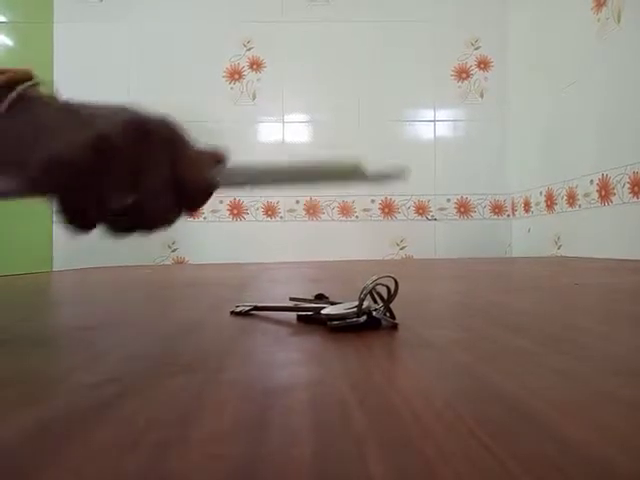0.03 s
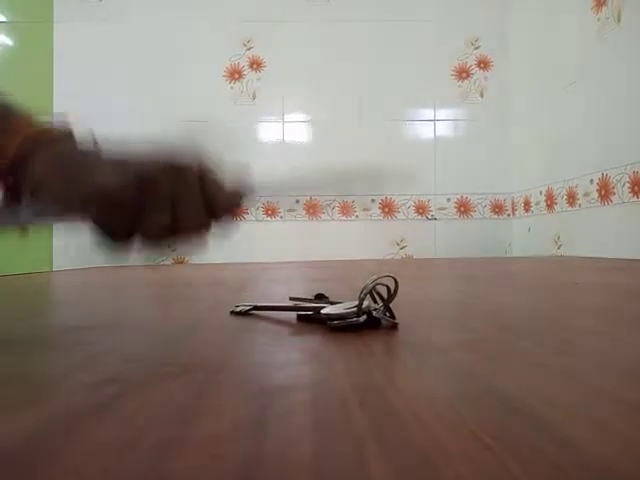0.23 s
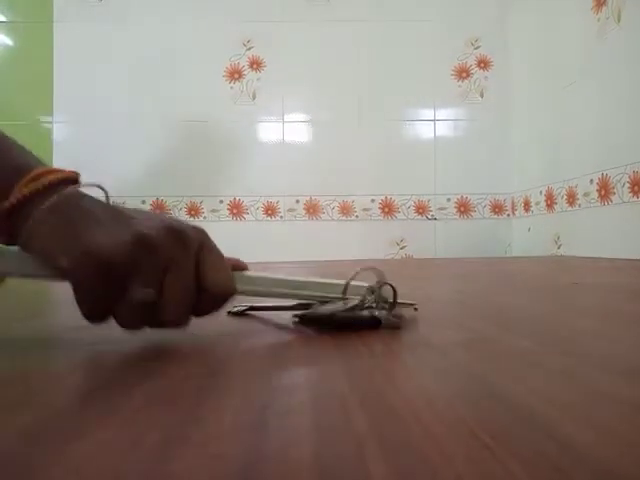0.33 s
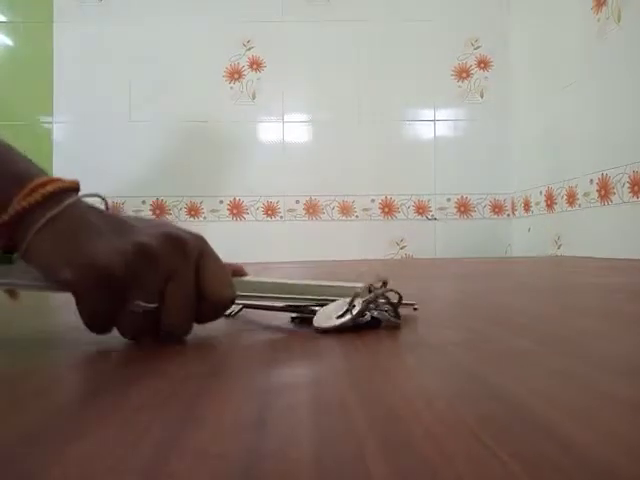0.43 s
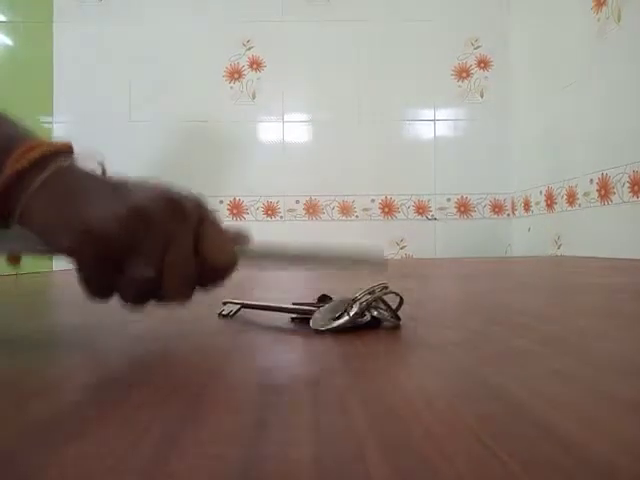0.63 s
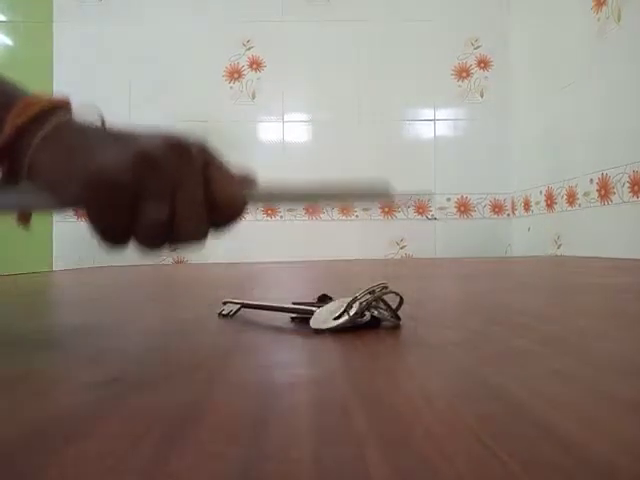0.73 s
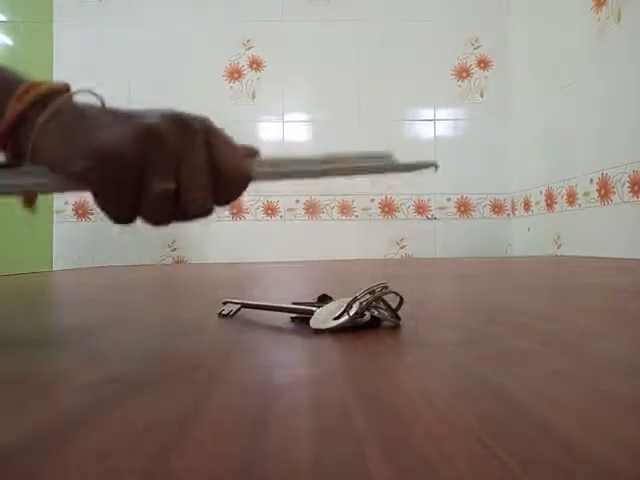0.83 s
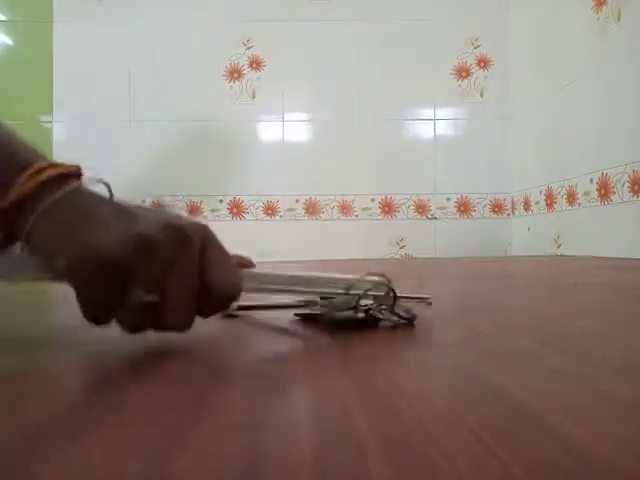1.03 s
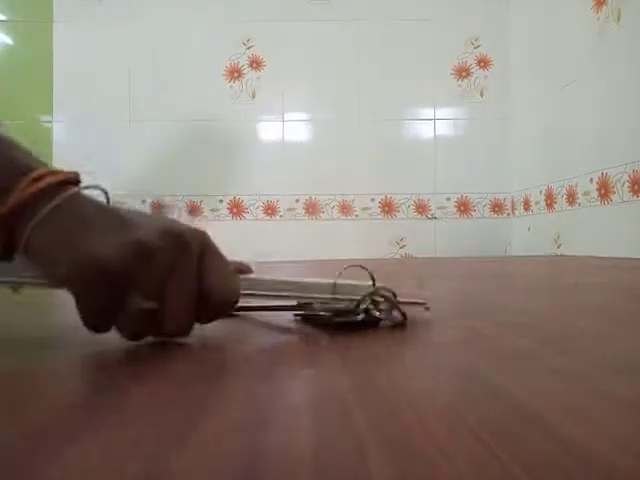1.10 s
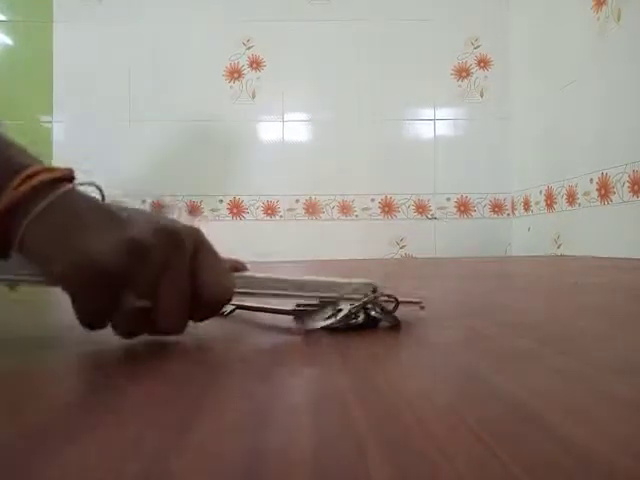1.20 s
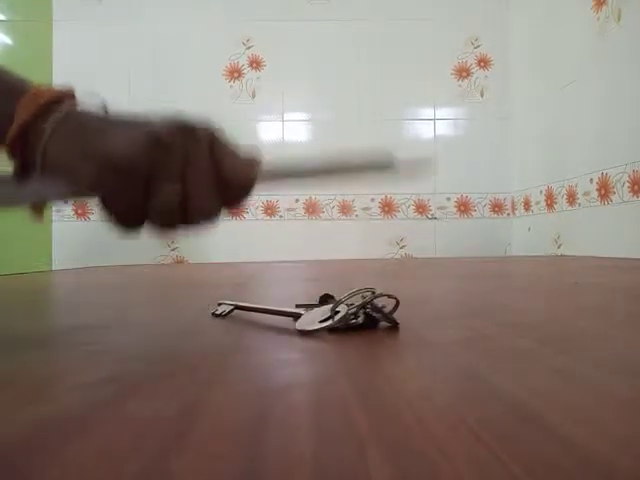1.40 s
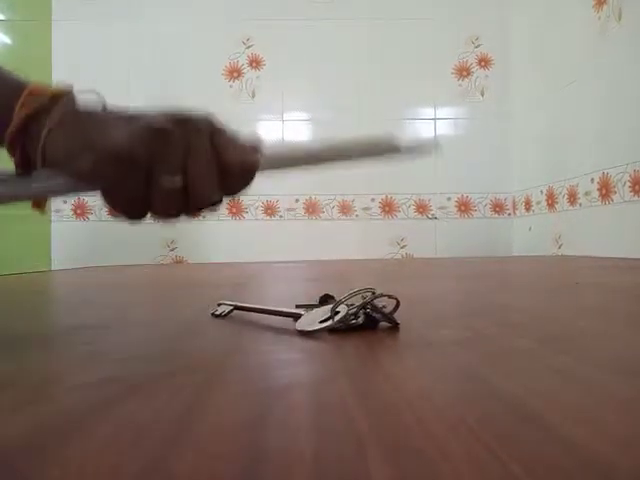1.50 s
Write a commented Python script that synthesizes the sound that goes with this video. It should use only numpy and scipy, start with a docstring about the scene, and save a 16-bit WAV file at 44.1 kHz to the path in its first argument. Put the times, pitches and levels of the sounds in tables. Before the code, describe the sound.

A bunch of keys jangles as a metal stick hits it twice on a table.

```python
"""A hand knocks on a hard table in a tiled room. Just after, at about 0.3 s, a metal stick comes down
on a bunch of keys lying there. The blow breaks into chattering contacts and shoves the keys along,
jangling. Every contact thuds in the table, clacks in the stick and rings in the keys and the thin
split rings that hold them. At about 1 s the stick comes down again; the keys jangle and rubbing metal
squeals faintly. Last, the echo of the tiled walls dies away over a quiet background."""
import sys
import numpy as np
from scipy import signal
from scipy.fft import rfft, irfft
from scipy.io import wavfile
from scipy.ndimage import uniform_filter1d

SR = 44100
rng = np.random.default_rng(int(sys.argv[2]) if len(sys.argv) > 2 else 0)


def unload_wav(signal):
    """Save mono or channel-first audio to the path in sys.argv[1] as 16-bit WAV at rate SR, clipped to [-1, 1]."""
    wavfile.write(
        sys.argv[1],
        SR,
        np.round(np.clip(np.atleast_2d(signal).T, -1, 1) * 32767).astype(np.int16),
    )


N = 68355

# each contact: start_s, chatter_decay_s, table_db, stick_db, keys_db, split_rings_db
CONTACT_HITS = [(0.2235, 0.0092, -28, -32.5, -30.5, -58), (0.3199, 0.00056, -34, -28, -23, -20.5),
                (0.3294, 0.0047, -33, -23.5, -14.5, -26), (.4170, 0.009, -56, -27, -29.5, -50),
                (0.4325, 0.0066, -41.5, -29.5, -30, -48), (.4400, 0.0012, -37, -25.5, -34, -48),
                (0.4463, .005, -49, -35, -29.5, -49), (0.482, 0.012, -36.5, -27.5, -49, -44),
                (.5110, 0.0064, -33, -49, -50, -58), (.9945, 0.0036, -36.5, -35, -29, -22.5),
                (0.9975, 0.0037, -40, -26.5, -28, -33), (1.0019, 0.0056, -37, -27, -29.5, -52),
                (1.0239, 0.0033, -41, -32.5, -32, -46), (1.0475, 0.0079, -38, -38, -27, -34.5),
                (1.06, 0.00067, -34, -54, -34.5, -45), (1.066, 0.0042, -41, -53, -39, -43),
                (1.0780, 0.006, -33, -36, -29.5, -28), (1.0811, 0.006, -39, -38.5, -42, -39),
                (1.1085, 0.0088, -32.5, -26.5, -31.5, -41), (1.1148, 0.0044, -45, -40, -46, -35),
                (1.1283, 0.0022, -59, -59.5, -30, -47), (1.1357, 0.0016, -53, -37, -26.5, -55),
                (1.1780, 0.0048, -39, -26, -31, -55), (1.2373, 0.0027, -31, -28.5, -47, -47),
                (1.248, 0.014, -38, -31.5, -52, -40), (1.284, .014, -52, -42.5, -74, -57)]
# the keys slide and jostle: peak_s, rise_s, fall_s, table_db, stick_db, keys_db, split_rings_db
KEY_SLIDES = [(0.261, 0.02, 0.016, -39, -51, -53, -70), (0.423, 0.038, 0.088, -43, -49, -32, -62),
              (0.456, 0.064, 0.065, -47, -42.5, -52, -67), (1.061, 0.022, 0.049, -46.5, -33.5, -35.5, -69),
              (1.19, 0.037, 0.018, -43.5, -40, -74, -49)]
# the overall tone of each object: pitch_hz, level_db
TABLE_TONE = [(25, -21.5), (60, -8.5), (120, 4.5), (220, 1.5), (330, 1), (520, 1), (900, -5.5),
              (2000, -23.5), (6000, -65.5)]
STICK_TONE = [(150, -38.5), (600, -5), (950, -1), (1500, 1.5), (2250, 1), (2800, -6.5), (4500, -11),
              (9000, -45.5)]
KEY_TONE = [(700, -21), (2200, -8.5), (3200, -2.5), (4200, -2.5), (5300, 3), (6600, 1.5), (7200, -5),
            (8000, -8.5), (9300, 0), (10300, -3), (11200, -2), (12300, -10.5), (16000, -6)]
SPLIT_RING_TONE = [(3000, -28.5), (7500, -4.5), (9200, 8), (11000, -24), (12800, 12), (14000, 3.5),
                   (15200, 3.5), (16500, 11.5)]
# the notes each object rings with: pitch_hz, energy_db (against its overall tone), fade_s (to fall 60 dB)
TABLE_NOTES = [(122.8, -13, 0.33), (174.8, -22.5, .35), (327.8, -9.5, 0.25), (334.5, -10, 0.19),
               (464, -16, 0.084), (865, -23, 0.18)]
STICK_NOTES = [(1000, -24, 0.24), (1146, -35, .15), (1253, -18, .2), (1603, -16, 0.094), (1840, -30, 0.12),
               (2222, -33.5, 0.2)]
KEY_NOTES = [(5310, -22, .08), (5910, -21, .07), (6720, -24, .15), (9410, -18, .1), (10470, -25, .1),
             (11140, -23, .2)]
SPLIT_RING_NOTES = [(13710, -20, .06), (14140, -21, .06), (14850, -20, .05)]
# the heavier blows send a low bump through the table: start_s, level_db
TABLE_BUMPS = [(0.3285, -26), (0.9953, -35.5)]
# a split ring is flicked: start_s, level_db
SPLIT_RING_PINGS = [(.9985, -21), (1.0805, -26.5)]
# metal rubs on metal and sings: peak_s, rise_s, fall_s, pitch_hz, level_db
METAL_SQUEALS = [(.484, .012, .01, 15070, -45), (1.047, .016, .016, 6720, -36),
                 (1.07, .025, .13, 11140, -49), (1.172, .025, .03, 6720, -43),
                 (1.275, .022, .022, 1287, -41)]
# how long the room echoes: pitch_hz, fade_s (to fall 60 dB)
ECHO_FADES = [(80, 2.74), (210, 1.36), (560, 1.01), (1470, 1.01), (3880, 0.92), (6000, 0.83), (10200, 0.56),
              (14500, 0.31)]
# how loud the echo is: pitch_hz, level_db (against the direct sound)
ECHO_LEVELS = [(70, -6.5), (200, -3), (400, -1), (1400, -5), (3500, -6), (6000, -5), (10000, -8),
               (14500, -16)]
# the tone of the room's background: pitch_hz, level_db
BACKGROUND_TONE = [(30, -25), (90, -2.5), (215, -0.5), (450, -23), (1650, -25.5), (1960, -10),
                   (2500, -32.5), (3200, -17.5), (4600, -33), (16000, -44)]

CONTACT_S = .005  # a contact's level is its average (rms) over this time
TOUCH_S = 0.00066  # the first touch carries as much energy as this much chatter
ECHO_GAP_S, ECHO_BUILD_S = 0.0022, 0.0057


def contact_force(column):
    """The push on one object: each contact is a touch, then dying chatter; sliding adds tiny impacts."""
    t, force = np.arange(N) / SR, np.zeros(N)
    chatter = tiny_impacts(per_s=7000, spread_db=2.5)
    jostle = tiny_impacts(per_s=6000, spread_db=3)
    for start_s, decay_s, *levels_db in CONTACT_HITS:
        start = int(start_s * SR)
        touch_share = TOUCH_S / (TOUCH_S + decay_s)
        dying_chatter = unit_energy(chatter[start:] * np.exp(-t[:N - start] / decay_s))
        burst = np.sqrt(1 - touch_share) * dying_chatter
        burst[0] += np.sqrt(touch_share)
        force[start:] += from_db(levels_db[column]) * np.sqrt(CONTACT_S * SR) * burst
    for peak_s, rise_s, fall_s, *levels_db in KEY_SLIDES:
        force += from_db(levels_db[column]) * swell(peak_s, rise_s, fall_s) * jostle
    return force


def tiny_impacts(per_s, spread_db):
    """Clicks of uneven size at random times, with an average (rms) level of 1."""
    sizes = from_db(spread_db * np.minimum(rng.exponential(1, N), 4))
    signs = rng.choice([-1, 1], N)
    happens = rng.random(N) < per_s / SR
    return unit_energy(sizes * signs * happens) * np.sqrt(N)


def struck_object(tone, notes, column):
    """An object answers each push with a short knock and ringing notes; column picks its levels."""
    t, knock = np.arange(N) / SR, click_with_tone(tone)
    answer = sum(from_db(energy_db) * unit_energy(np.sin(2 * np.pi * pitch_hz * t) * fade(t, fade_s))
                 for pitch_hz, energy_db, fade_s in notes)
    answer[:len(knock)] += knock
    return signal.fftconvolve(contact_force(column), unit_energy(answer))[:N]


def struck_note(hits, pitch_hz, fade_s):
    """Each hit sets the same note ringing again."""
    ringing = np.zeros(N)
    for start_s, level_db in hits:
        t = np.maximum(np.arange(N) / SR - start_s, 0)
        ringing += from_db(level_db) * np.sin(2 * np.pi * pitch_hz * t) * fade(t, fade_s)
    return ringing


def metal_squeals(waver_hz=12):
    """Metal rubbing on metal makes one note at a time swell up, slightly unsteady in pitch."""
    waver = unit_energy(uniform_filter1d(rng.standard_normal(N), size=300)) * np.sqrt(N)
    squeals = np.zeros(N)
    for peak_s, rise_s, fall_s, pitch_hz, level_db in METAL_SQUEALS:
        phase = 2 * np.pi * np.cumsum(pitch_hz + waver_hz * waver) / SR
        squeals += from_db(level_db) * swell(peak_s, rise_s, fall_s) * np.sqrt(2) * np.sin(phase)
    return squeals


def first_echoes(sound, level_db=-8.5):
    """The tabletop and near walls throw back a quick cluster of echoes right behind each sound."""
    cluster = unit_energy(rng.standard_normal(N) * fade(np.arange(N) / SR, fade_s=.06))
    return from_db(level_db) * signal.fftconvolve(sound, cluster)[:N]


def room_echo(sound):
    """The tiled walls blur the sound into a long echo whose low pitches last longest."""
    t = np.maximum(np.arange(N) / SR - ECHO_GAP_S, 0)
    build_up = 1 - np.exp(-t / ECHO_BUILD_S)
    edges_hz = np.geomspace(35, 18000, 28)  # bands a third of an octave wide
    noises, tail = rng.standard_normal((2, N)), 0
    for k, (low_hz, high_hz) in enumerate(zip(edges_hz, edges_hz[1:])):
        middle_hz = np.sqrt(low_hz * high_hz)
        band_filter = signal.butter(3, [low_hz, high_hz], "band", fs=SR, output="sos")
        band = signal.sosfilt(band_filter, noises[k % 2])  # neighbouring bands use different noise
        shape = build_up * fade(t, at_hz(ECHO_FADES, middle_hz))
        gain = from_db(at_hz(ECHO_LEVELS, middle_hz)) * np.sqrt(2 * (high_hz - low_hz) / SR)
        tail = tail + gain * unit_energy(band * shape)
    return signal.fftconvolve(sound, tail)[:N]


def background(level_db=-69.5):
    """The quiet, steady, low noise of the room."""
    noise = rng.standard_normal(2 * N)
    return from_db(level_db) * signal.fftconvolve(noise, click_with_tone(BACKGROUND_TONE))[N:2 * N]


def click_with_tone(tone, size=4096):
    """A click with the given tone, its energy packed at the start (a minimum-phase filter)."""
    hz = np.arange(size // 2 + 1) * SR / size
    cepstrum = irfft(np.log(from_db(at_hz(tone, hz))))
    # fold the second half onto the first, so nothing sounds before the hit
    cepstrum[1:size // 2] *= 2
    cepstrum[size // 2 + 1:] = 0
    return unit_energy(irfft(np.exp(rfft(cepstrum))))


def from_db(db):
    """Turn decibels into a number to multiply by."""
    return 10 ** (np.asarray(db) / 20)


def unit_energy(x):
    """Scale a signal so that its squares add up to one."""
    return x / np.sqrt(np.sum(x ** 2) + 1e-20)


def at_hz(table, hz):
    """Read between a table's rows, with every octave equally wide."""
    pitches_hz, values = np.transpose(table)
    return np.interp(np.log(np.maximum(hz, 1)), np.log(pitches_hz), values)


def fade(t, fade_s):
    """A level that falls 60 dB in fade_s."""
    return np.exp(-np.log(1000) * t / fade_s)


def swell(peak_s, rise_s, fall_s):
    """A level that rises and falls in a bell shape."""
    t = np.arange(N) / SR - peak_s
    return np.exp(-.5 * (t / np.where(t < 0, rise_s, fall_s)) ** 2)


def scene():
    """Table, stick, keys and split rings sound together in the tiled room."""
    table = struck_object(TABLE_TONE, TABLE_NOTES, column=0)
    stick = struck_object(STICK_TONE, STICK_NOTES, column=1)
    keys = struck_object(KEY_TONE, KEY_NOTES, column=2)
    split_rings = struck_object(SPLIT_RING_TONE, SPLIT_RING_NOTES, column=3)
    bumps = struck_note(TABLE_BUMPS, pitch_hz=110.4, fade_s=0.042)
    pings = struck_note(SPLIT_RING_PINGS, pitch_hz=14140, fade_s=.06)
    direct = table + stick + keys + split_rings + bumps + pings
    return (direct + metal_squeals() + first_echoes(direct) + room_echo(direct) + background())[None]


def record(dry):
    """The loudest peaks are rounded off, and the deepest bass and highest treble are cut away."""
    overload_level, bass_cut_hz, treble_cut_hz = .42, 42, 15720
    rounded = overload_level * np.tanh(dry / overload_level)
    thinned = signal.sosfilt(signal.butter(4, bass_cut_hz, "high", fs=SR, output="sos"), rounded)
    return signal.sosfilt(signal.ellip(12, .2, 80, treble_cut_hz, fs=SR, output="sos"), thinned)


dry = scene()
out = record(dry)
unload_wav(out)
```